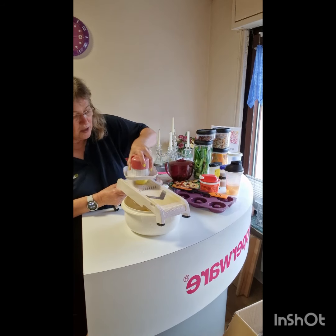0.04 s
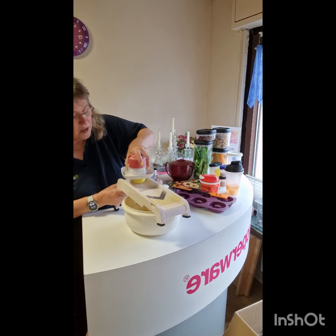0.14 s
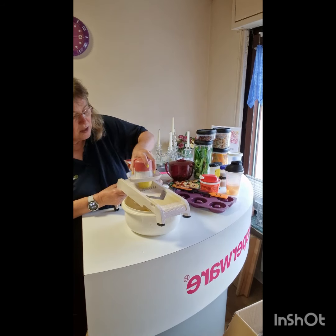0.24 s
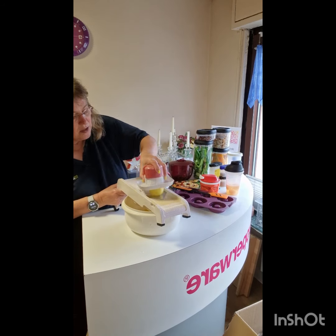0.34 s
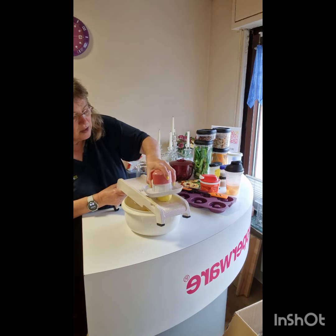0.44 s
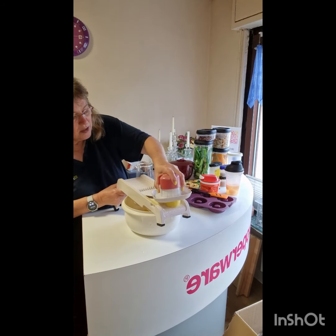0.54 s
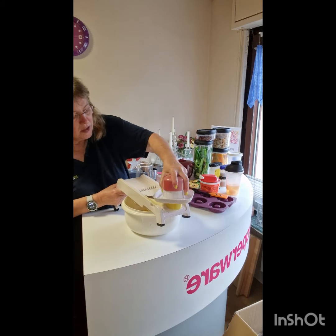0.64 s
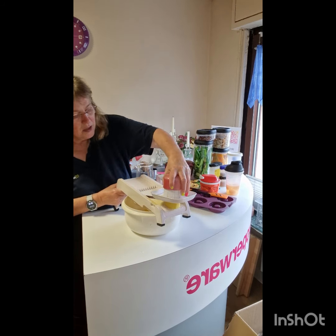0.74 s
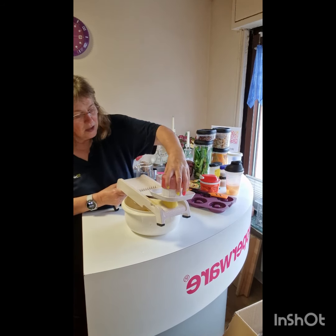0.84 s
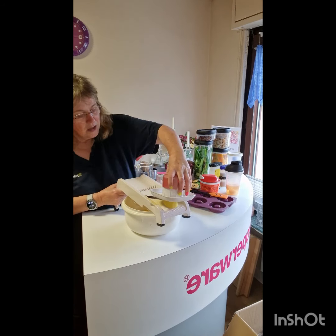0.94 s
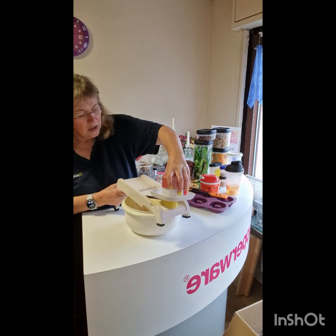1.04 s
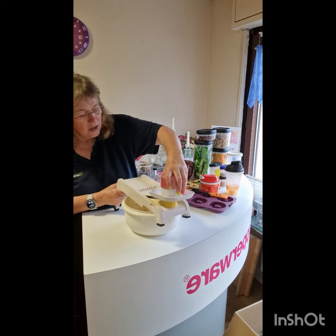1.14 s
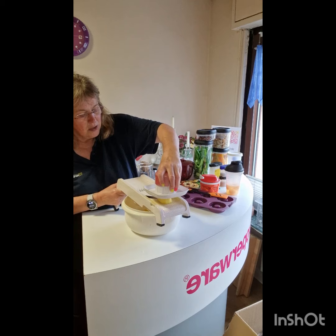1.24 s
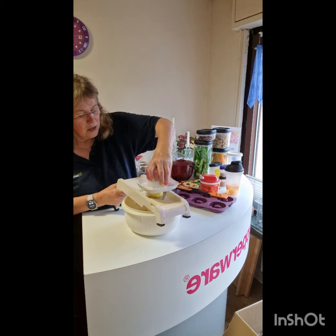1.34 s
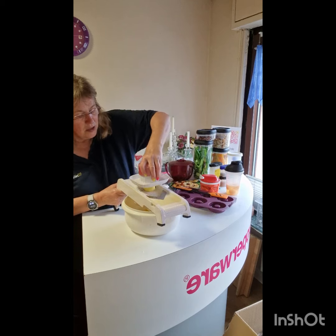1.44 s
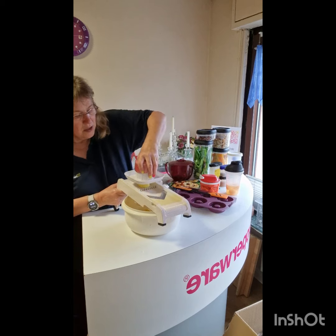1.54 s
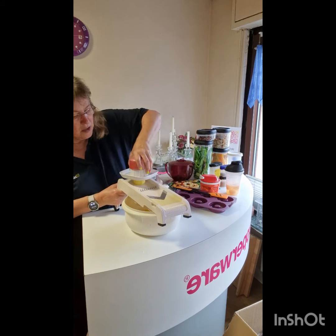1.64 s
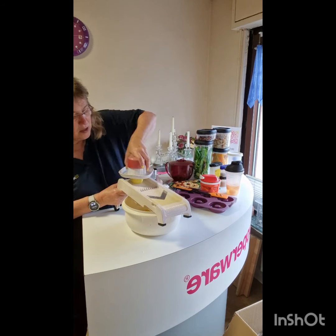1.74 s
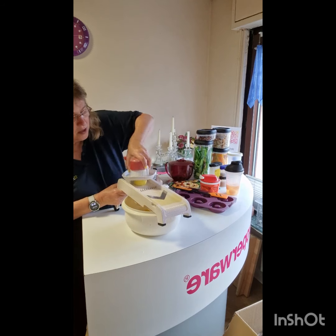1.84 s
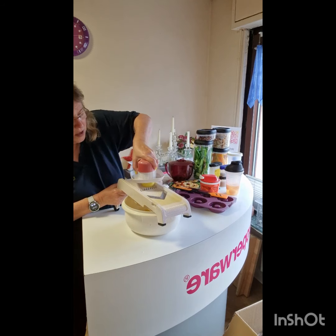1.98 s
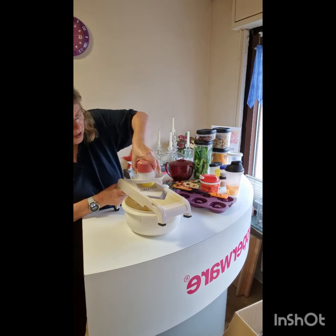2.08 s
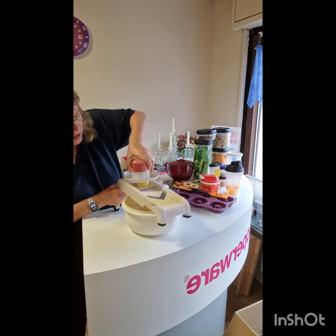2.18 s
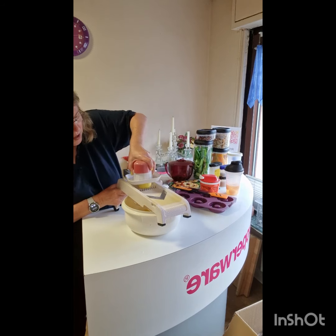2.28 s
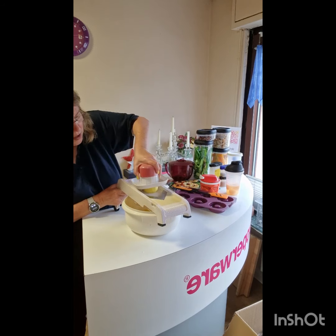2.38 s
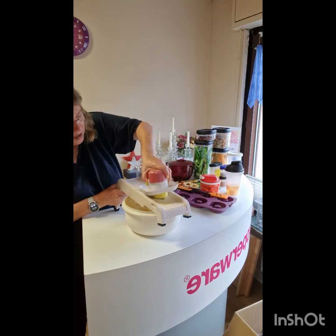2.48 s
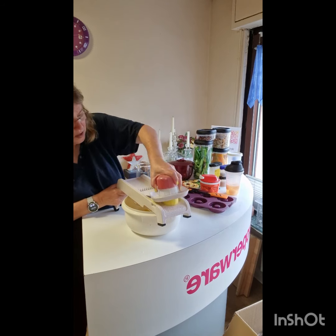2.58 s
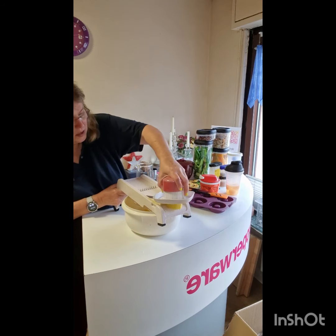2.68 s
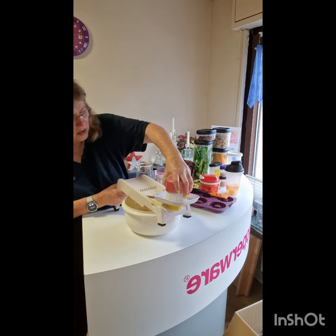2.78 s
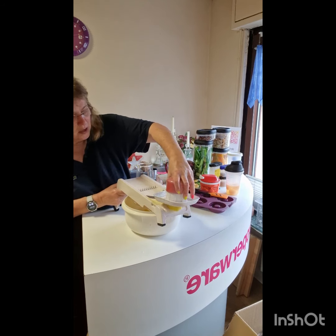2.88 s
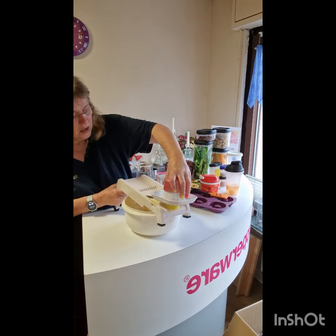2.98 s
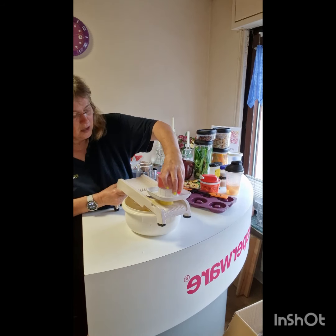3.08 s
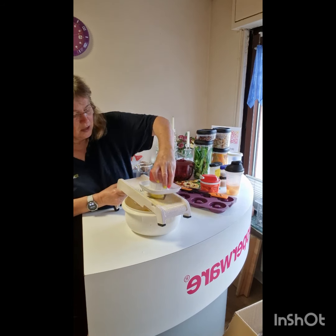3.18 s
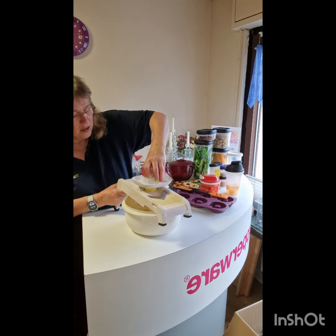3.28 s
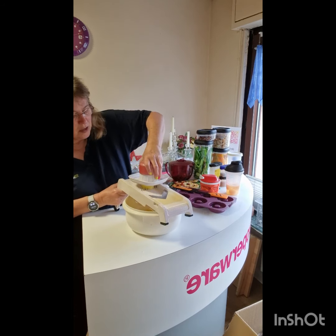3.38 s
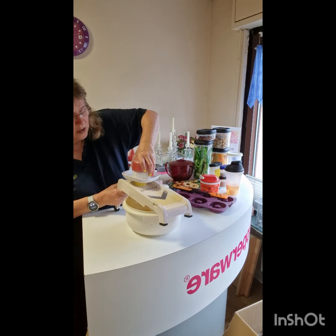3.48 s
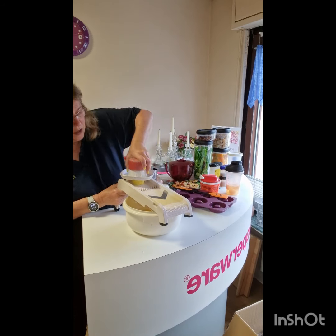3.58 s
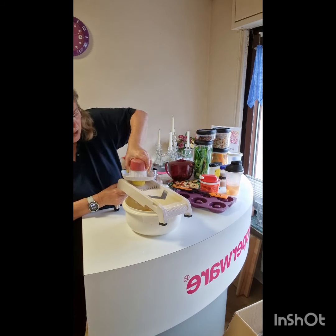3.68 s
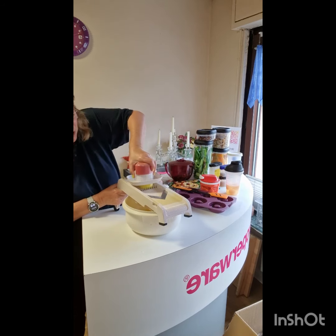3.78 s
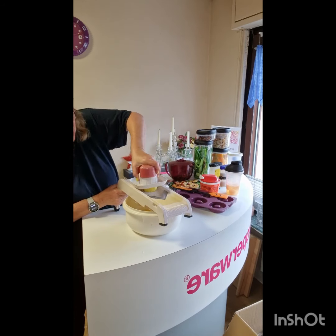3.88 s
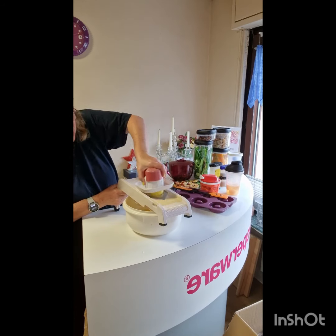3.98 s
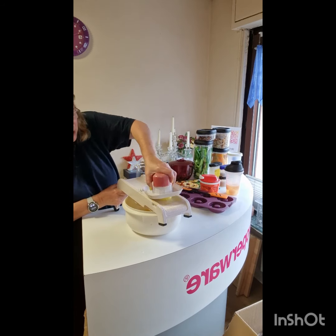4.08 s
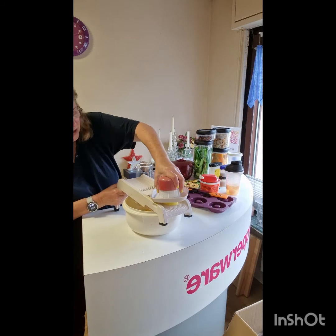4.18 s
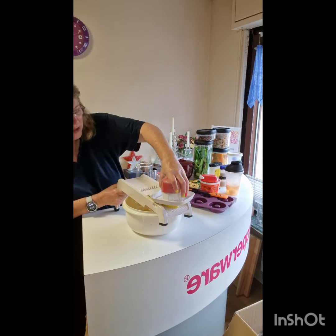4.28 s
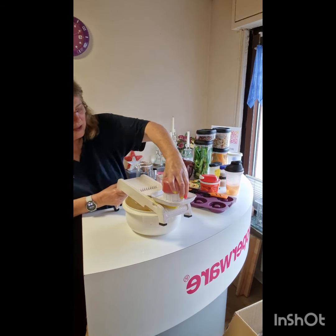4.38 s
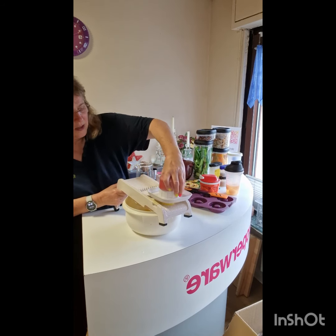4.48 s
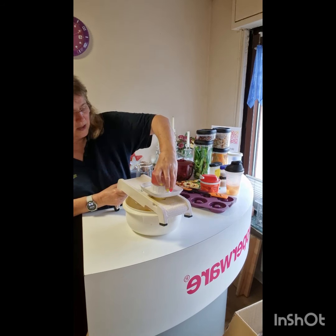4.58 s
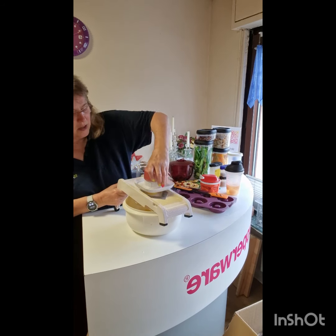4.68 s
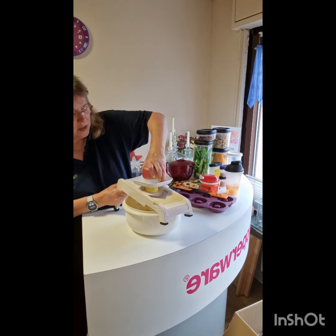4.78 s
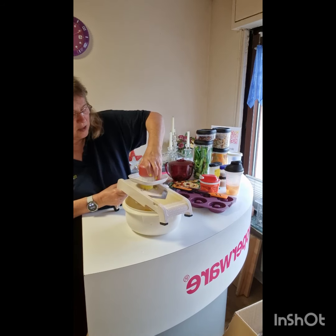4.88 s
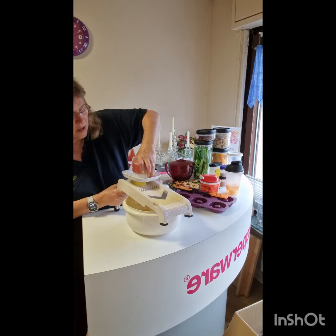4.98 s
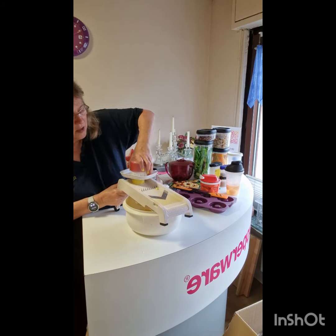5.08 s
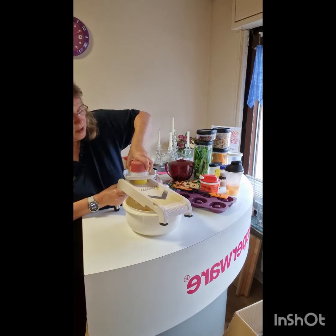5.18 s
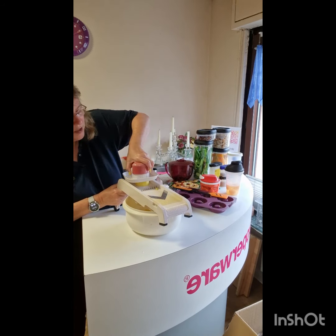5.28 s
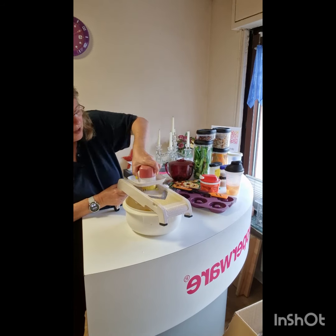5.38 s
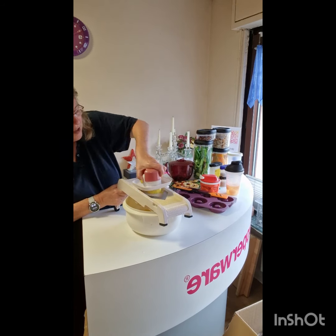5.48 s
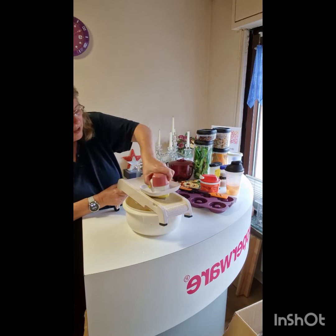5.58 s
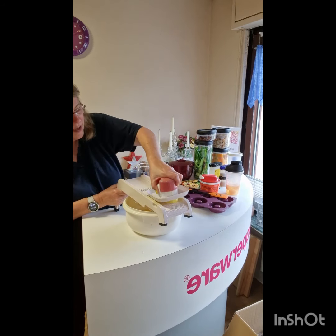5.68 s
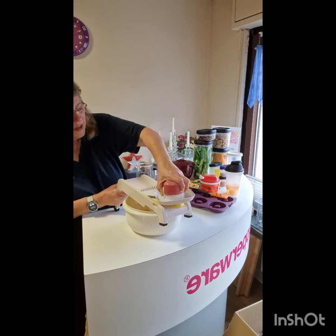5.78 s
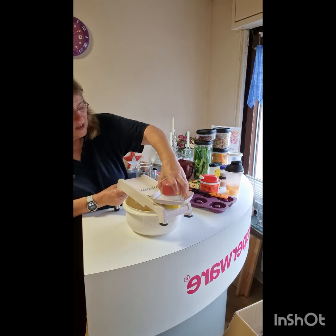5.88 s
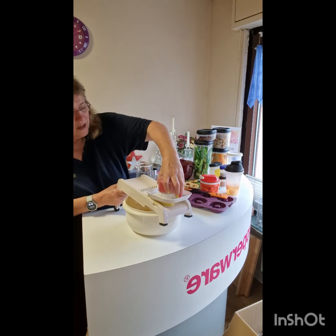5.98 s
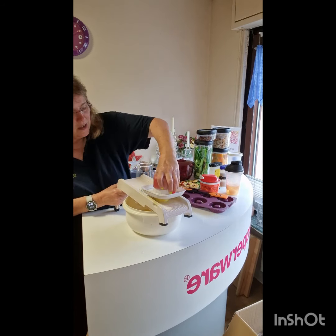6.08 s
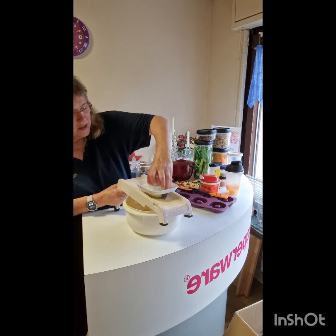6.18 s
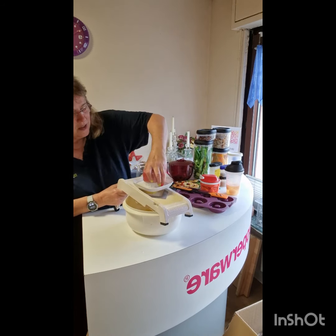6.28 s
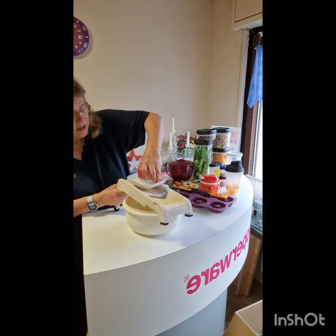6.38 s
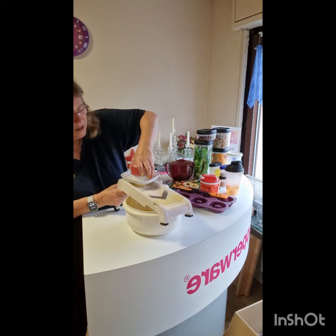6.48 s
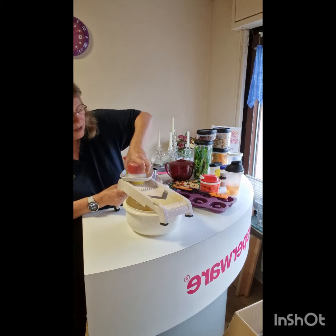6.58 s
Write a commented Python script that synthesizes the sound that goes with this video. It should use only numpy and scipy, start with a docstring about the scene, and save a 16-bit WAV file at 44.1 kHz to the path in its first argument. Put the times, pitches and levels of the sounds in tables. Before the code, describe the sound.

In a small hard kitchen with very quiet air, a plastic holder taps and slides lightly on a slicer ramp, then knocks at 0.4 s and drives through the blades with a bright, wet crunch that fades fast. A near-quiet pause follows until 1.5 s, when the return jolts with a hard clack, low thump and short scrape, trailed by small taps. A second, longer crunch comes at 2.4 s, ending around 2.8 s in a brief rising squeaky judder. The return at 3.3 s clatters sharply. Knocks lead to a cut at 3.9 s, with a strong clack at 4.15 s and rattling glides. Another return bangs and scrapes at 4.75 s; the fourth crunch is at 5.5 s, and a last return thuds and rasps at 6.3 s. The bowl rings hollowly and briefly; the counter booms and groans faintly. Sound leans slightly left.

```python
"""A potato is sliced in four forward strokes on a mandoline: random grains filtered to a crunch and a wet fizz.
Its plastic holder knocks on the frame (clusters of impacts through resonances) and glides on the ramp
(small catches); each return jolts and scrapes over the blades, and one stroke ends in a stick-slip judder.
The bowl beneath rings as damped modes, and the counter thumps, booms and groans.
A small hard room adds decaying reflections over a quiet room tone."""
import sys
import numpy as np
from scipy import signal
from scipy.fft import rfft, irfft
from scipy.io import wavfile
from scipy.ndimage import uniform_filter1d

SR = 44100
rng = np.random.default_rng(int(sys.argv[2]) if len(sys.argv) > 2 else 0)


def digitize_waveform(pressure):
    """Quantize a signal to 16-bit integers and store it at the path in sys.argv[1].

    Rows of a 2-D input are taken as channels; values are limited to [-1, 1].
    """
    field = np.atleast_2d(pressure).T
    bounded = np.clip(field, -1, 1)
    quanta = np.round(bounded * 32767).astype(np.int16)
    wavfile.write(sys.argv[1], SR, quanta)


N = 292383
T = np.arange(N) / SR  # time/s
HZ = np.fft.rfftfreq(2 * N, 1 / SR)  # f/Hz, for a signal padded to twice its length
HIT = SR // 2  # samples given to one blow or one reverberant tail

# Relative spectra and event levels below are set before the fixed trims of the mix.
# Quiet air of the room: [f/Hz, relative level/dB]
ROOM_TONE_SPECTRUM = [(20, -4), (55, 0), (100, -10), (200, -20), (337, -16), (450, -23), (920, -26),
                      (1700, -27), (4200, -32), (7500, -36), (10500, -48), (16000, -50)]
# Reverberation of the kitchen: [f/Hz, t60/s, reverberant minus direct level/dB]
ROOM_DECAY = [(102, 0.49, -12), (237, 0.27, -9.5), (480, 0.57, -7), (1120, 0.48, 5.5), (3450, 0.3, 3.5),
              (8100, 0.32, 6), (16000, 0.36, 5)]
# Lateral balance: [f/Hz, left minus right level/dB]
LEFT_LEAN = [(100, .5), (500, .9), (1000, 2.4), (2000, 3.4), (4000, 3.8), (8000, 2.1), (14000, 2.3)]
# Modes of the counter top: [f/Hz, t60/s, level/dB]
COUNTER_MODES = [(31.5, 0.25, -11), (47, 0.48, 4), (73, 0.49, -0.5), (127.3, 0.52, 4.5), (191.6, 0.23, 3.5),
                 (258, 0.1, 4), (332, 0.077, 9.5)]
# Rocking of the counter: [f/Hz, relative level/dB]
BOOM_SPECTRUM = [(12, -28.5), (30, 3), (52, 0), (75, 4), (110, -7), (160, -28.5), (400, -58.5)]
# Friction of the bowl's foot on the counter: [f/Hz, relative level/dB]
GROAN_SPECTRUM = [(80, -24), (135, 8), (190, -6.5), (260, -3.5), (305, -11), (365, -2), (430, -9),
                  (900, -45.5)]
# The bowl's foot shifts on the counter: [t/s, length/s, groan level/dB, boom level/dB]
FOOT_SHIFTS = [(0.044, 0.19, -70, -65), (0.45, 0.049, -57, -51), (0.685, 0.049, -62.5, -61.5),
               (0.796, 0.026, -64, -62), (0.913, 0.054, -77, -61.5), (1.48, 0.032, -37, -56),
               (1.817, 0.02, -55, -84), (2.078, 0.04, -67, -60), (2.45, 0.15, -60, -58),
               (3.703, 0.071, -42.5, -45.5), (4.105, 0.092, -52.5, -47), (4.305, 0.046, -47, -52.5),
               (4.781, 0.018, -41, -35.5), (4.86, 0.14, -74, -58), (5.193, 0.11, -50.5, -55),
               (5.81, 0.083, -62, -57), (5.892, 0.16, -55.5, -59), (6.333, 0.027, -43, -34)]
# Modes of the bowl under the slicer: [f/Hz, t60/s, level/dB]
BOWL_MODES = [(335.7, 0.24, -18), (381.8, 0.18, -9.5), (508.5, 0.19, -8), (540, 0.053, 4),
              (588, 0.073, -6.5), (673.6, 0.12, -14.5), (698, 0.12, -5.5), (760, 0.084, -9.5)]
# Resonances of the slicer frame: [f/Hz, width/Hz, level/dB]
FRAME_RESONANCES = [(1064.4, 35.5, 1.5), (1416, 164, -4.5), (1541, 120, -7), (2010, 140, -7),
                    (2210, 136, -7), (2594, 8.2, -7), (3112, 170, -1.5), (3820, 160, -4), (4050, 310, -7),
                    (4900, 370, -4.5), (5790, 680, -1.5), (7480, 150, 1)]
# Holder gliding on the ramp: [t/s, length/s, level/dB]
RAMP_GLIDES = [(0.013, 0.032, -56), (0.177, 0.36, -70.5), (0.618, 0.24, -76), (1.982, 0.37, -63),
               (2.89, 0.29, -67), (3.257, 0.05, -56), (3.34, 0.019, -56), (3.621, 0.74, -61.5),
               (4.24, 0.17, -57.5), (4.57, 0.38, -62), (5.078, 0.37, -59), (5.83, 0.23, -55.5),
               (6.256, 0.08, -55.5)]
# Plastic rubbing on the ramp: [f/Hz, relative level/dB]
GLIDE_SPECTRUM = [(200, -32), (380, 4.5), (540, 14), (850, 3.5), (1500, 0), (2300, -3.5), (4000, -9),
                  (7000, -19), (10000, -22.5), (16000, -55)]
# Holder sticking and slipping at the foot of the ramp:
# [t/s, slip rate/(1/s), squeak f/Hz, frame level/dB, bowl ring level/dB]
STICK_SLIP = [(2.745, 150, 1120, -58, -68), (2.775, 150, 1190, -47, -62), (2.805, 140, 1250, -44, -58),
              (2.825, 115, 1500, -44, -58), (2.855, 130, 1510, -44, -47), (2.875, 130, 1520, -45, -53),
              (2.895, 130, 1550, -56, -60)]
# Scraping of the stick-slip contact: [f/Hz, relative level/dB]
RASP_SPECTRUM = [(400, -45), (1000, -1.5), (1600, 0), (2250, 3.5), (3200, -8.5), (5000, -16.5), (8000, -29),
                 (16000, -37)]
# Holder meeting the frame: [t/s, clack level/dB, edge tick level/dB, bowl ring level/dB,
# counter thump level/dB, clack centre f/Hz, bowl centre f/Hz]
FRAME_KNOCKS = [(0.033, -53, -69, -59, -68, 920, 490), (0.0462, -48.5, -63, -58.5, -55, 2160, 590),
                (0.0772, -59, -56.5, -69, -58, 1280, 347), (0.1594, -70, -69, -54, -56, 1500, 532),
                (0.1786, -50.5, -72, -59, -69, 1820, 520), (0.2449, -77, -86, -54, -76, 910, 527),
                (0.2606, -55, -90, -68, -65, 2260, 475), (0.3298, -52.5, -64, -56, -74, 2220, 520),
                (0.3865, -38.5, -40.5, -41, -39, 1770, 576), (0.666, -65, -74, -54.5, -64, 1950, 522),
                (1.4175, -54.5, -54, -59, -68, 1440, 566), (1.4456, -48, -55.5, -48.5, -67, 1780, 506),
                (1.481, -34, -38.5, -32.5, -42, 1700, 348), (1.5146, -45, -50, -61, -36.5, 1970, 396),
                (1.531, -43, -45, -50, -37, 2270, 394), (1.599, -52, -70, -66, -48, 2200, 358),
                (1.6676, -47, -75, -49.5, -59, 1970, 545), (1.7114, -49.5, -83, -53, -65, 1910, 503),
                (1.7485, -52.5, -82, -57, -63, 1900, 513), (2.0948, -48.5, -51, -58, -62, 2200, 575),
                (2.2424, -55.5, -86, -61, -62, 2050, 368), (2.301, -68, -90, -55.5, -54, 1470, 500),
                (2.427, -39, -41, -40, -56, 1820, 590), (2.5961, -46, -66, -48, -44, 1060, 520),
                (2.8477, -56, -77, -46, -70, 1480, 375), (2.958, -63, -88, -44, -63, 1580, 540),
                (3.3051, -44, -59, -52, -49, 1960, 580), (3.3309, -41, -47, -33, -58, 1040, 607),
                (3.3664, -37, -32, -44, -44, 1060, 620), (3.3715, -29.5, -42, -36, -35, 2600, 504),
                (3.4176, -43, -60, -34, -37, 2470, 507), (3.4436, -44, -66, -39, -48, 1560, 522),
                (3.5044, -65, -61, -45.5, -38.5, 2230, 533), (3.711, -45.5, -46.5, -35.5, -68, 1760, 543),
                (3.7231, -37.5, -55, -39, -40.5, 4000, 511), (3.7596, -36.5, -51.5, -51, -47, 1470, 416),
                (3.921, -42.5, -40.5, -37.5, -51, 1720, 520), (4.1406, -30, -42, -34, -43, 865, 530),
                (4.1474, -43, -42, -39, -46, 1080, 672), (4.2155, -44.5, -68, -45.5, -51, 1500, 524),
                (4.2665, -47.5, -77, -45.5, -43, 2160, 580), (4.326, -43, -59, -57, -38.5, 2230, 334),
                (4.3984, -49, -86, -54.5, -67, 1430, 554), (4.5396, -62, -83, -58.5, -52.5, 1448, 530),
                (4.6383, -57.5, -61, -65, -59, 1780, 550), (4.6683, -58, -53.5, -72, -67, 1540, 571),
                (4.715, -45.5, -61, -55, -47, 1790, 382), (4.7481, -43, -63, -47, -66, 2970, 490),
                (4.7651, -35, -43, -29, -35, 3180, 620), (4.7771, -35.5, -66, -31, -30, 1830, 538),
                (4.9247, -46, -50.5, -62, -62, 1940, 500), (5.125, -56.5, -76, -54.5, -56, 1630, 568),
                (5.3298, -58.5, -68, -68, -68, 2030, 520), (5.3559, -48, -63, -54, -55, 2180, 510),
                (5.375, -48, -59.5, -46.5, -58, 1050, 532), (5.4332, -42.5, -59, -39.5, -48.5, 1850, 540),
                (5.4886, -42, -39, -45.5, -45, 1940, 501), (5.5894, -47, -57, -43.5, -61, 3070, 555),
                (5.6406, -43.5, -49, -50, -45, 1420, 495), (5.7764, -44, -58, -50.5, -60, 1100, 625),
                (5.9933, -43, -71, -48, -56, 1280, 470), (6.2969, -46.5, -57, -39, -46, 1080, 513),
                (6.3268, -34.5, -49, -37, -33.5, 1070, 490), (6.3373, -37.5, -44, -36, -33.5, 1050, 400),
                (6.6089, -50.5, -62, -47, -70, 1510, 540)]
# Impact on the frame: [f/Hz, relative level/dB]
CLACK_SPECTRUM = [(250, 5), (600, -7), (1000, 0), (2000, 0.5), (3200, -6), (5000, -10), (7000, -35.5),
                  (10000, -33), (16000, -69)]
# Forward strokes through the blades: [t/s, length/s, crunch level/dB, wet fizz level/dB,
# bowl ring level/dB, easing/(dB/s), crunch centre f/Hz, load on the counter, level/dB]
FORWARD_CUTS = [(0.377, 0.18, -40, -46, -43.5, 91, 1640, -56.5),
                (2.412, 0.26, -43, -48, -44, 38, 2290, -52),
                (3.923, 0.29, -44.5, -51, -47.5, 11.5, 2120, -51),
                (5.496, 0.3, -41, -48, -43, 43.5, 2000, -52)]
# Return strokes over the blades: [t of jolt/s, jolt level/dB, lag until the scrape/s, scrape length/s,
# crunch level/dB, wet fizz level/dB, bowl ring level/dB, crunch centre f/Hz]
BLADE_RETURNS = [(1.472, -38.5, 0.1, 0.082, -45.5, -52.5, -66, 2220),
                 (3.336, -37, 0.094, 0.088, -47, -57.5, -50, 2770),
                 (4.764, -37, 0.15, 0.13, -43.5, -54, -48.5, 2160),
                 (6.316, -37, 0.1, 0.12, -42, -52.5, -49.5, 2130)]
# Flesh breaking at the blades: [f/Hz, relative level/dB]
CRUNCH_SPECTRUM = [(300, -10), (700, 4), (1200, 0), (2200, 2), (4000, -0.5), (6000, -7), (8000, -13),
                   (11000, -66), (16000, -18)]
# Wet fizz at the blades, also the colour of edge ticks: [f/Hz, relative level/dB]
FIZZ_SPECTRUM = [(3000, -22), (6000, -0.5), (7800, -1.5), (9000, -5.5), (11000, -7.5), (13000, -9.5),
                 (16000, -14.5)]

TOP_HZ = 15950
ROOM_TONE_DB = -70.5
RESTING_BOOM_DB, RESTING_GROAN_DB = -69.5, -72  # under the steadying hand
SHIFT_RISE_S, SHIFT_FALL_S = 0.025, 0.027
ROCK_FALL_S, GROAN_FALL_S, UNLOAD_S = 0.14, 0.083, 0.19  # settling after a jolt and after a cut
LOAD_SAG_DB_PER_S = 22.5  # the arm leans less as a cut goes on
GLIDE_RISE_S, GLIDE_FALL_S, GLIDE_CENTRE_HZ = 0.016, 0.094, 1860
SCUFF_S, SCUFF_DB = 0.0062, -8  # growth time of the rub before a knock; level relative to the clack
# a clack of level RATTLE_AT_DB has decay time RATTLE_S; growth in dB of time per dB of level
RATTLE_S, RATTLE_AT_DB, RATTLE_GROWTH = 0.0049, -44.5, 0.1
BITE_DB, BITE_S = 1, 0.075  # the blades' first bite is louder
CUT_RISE_S, CUT_FALL_S, DRYING_DB_PER_S = 0.01, 0.06, 28  # the fizz dies sooner than the crunch
SCRAPE_RISE_S, SCRAPE_FALL_S, SCRAPE_SAG_DB_PER_S = 0.024, 0.014, 35
JOLT_RISE_S, JOLT_FALL_S = 0.009, 0.063
JOLT_CRUNCH_DB, JOLT_FIZZ_DB, JOLT_BOWL_DB = -3.5, -17, -3  # relative to the jolt
CATCH_RATE, CATCH_DB = 55, 2.5  # the blades catch and let go: changes a second, spread of level


def undb(db):
    """Level: decibels convert to an amplitude ratio."""
    return 10 ** (np.asarray(db) / 20)


def unit(x):
    """Normalisation: the signal is scaled to rms 1."""
    return x / np.sqrt(np.mean(x ** 2))


def even(x, span_s):
    """Automatic levelling: division by the running rms holds a rumble near rms 1."""
    return x / np.sqrt(uniform_filter1d(x ** 2, int(span_s * SR)) + 1e-18)


def along(points, hz, column=1):
    """Interpolation: a table is read on a log-frequency axis."""
    rows = np.array(points)
    return np.interp(np.log(hz + 1), np.log(rows[:, 0]), rows[:, column])


def shape(x, gain):
    """Linear filtering: the spectrum is multiplied by a response given on HZ."""
    return irfft(rfft(x, 2 * N) * gain)[..., :N]


def causal(gain):
    """Minimum phase: the folded cepstrum gives a response that rings only after a blow."""
    cepstrum = irfft(np.log(gain))
    cepstrum[1:N] *= 2
    cepstrum[N + 1:] = 0
    return np.exp(rfft(cepstrum))


def envelope(start, length, rise_s, fall_s, sag_db_per_s=0):
    """Transient envelope: linear attack, a hold that may sag, and exponential release."""
    age = (T - start).clip(0)
    attack = (age / rise_s).clip(0, 1)
    hold = undb(-sag_db_per_s * np.minimum(age, length))
    release = np.exp(-(age - length).clip(0) / fall_s)
    return attack * hold * release


def flutter(rate, depth_db):
    """Random modulation: a gain wanders between Gaussian levels drawn `rate` times a second."""
    knots = rng.standard_normal(8192)
    return undb(depth_db * np.interp(T * rate, np.arange(len(knots)), knots))


def grains(rate, spread_db):
    """Shot noise: tiny random snaps, a few much larger than the rest."""
    size = undb(spread_db * rng.exponential(size=N).clip(0, 4))
    happens = rng.random(N) < rate / SR
    return unit(happens * size * np.sign(rng.standard_normal(N)))


def chatter(rise_s, fall_s):
    """Contact force: one contact is a quick cluster of small impacts of uneven size."""
    t = T[:HIT]
    impacts, size = rng.standard_normal((2, HIT))
    return impacts * undb(6.15 * size) * (1 - np.exp(-t / rise_s)) * np.exp(-t / fall_s)


def ring(modes, scatter_db, detune, weight=1):
    """Modal decay: damped sines whose strength and tuning vary at random with where the holder presses."""
    hz, t60, db = np.array(modes).T[:, :, None]
    strength, stretch = rng.standard_normal((2, len(modes), 1))
    t = T[:HIT]
    decay = undb(db + scatter_db * strength) * np.exp(-np.log(1000) * t / t60)
    waves = decay * np.sin(2 * np.pi * hz * (1 + detune * stretch) * t)
    return np.sum(waves.T * weight, axis=1)


def focus(hz, centre_hz, octaves, depth_db):
    """Selective excitation: the contact point favours the resonances around one pitch."""
    closeness = np.exp(-(np.log2((hz + 1) / centre_hz) / octaves) ** 2)
    return undb(depth_db * (closeness - 1))


def travel(x, centre_hz, octaves, depth_db):
    """Moving excitation: the favoured pitch shifts as the holder travels along the frame."""
    hz, s, frames = signal.stft(x, SR, nperseg=256)
    gain = focus(hz[:, None], np.interp(s, T, centre_hz), octaves, depth_db)
    return signal.istft(frames * gain, SR)[1][:N]


def blow(x, db):
    """Impact level: the energy of a blow is referred to 20 ms."""
    return x * undb(db) / np.sqrt(np.sum(x ** 2) / (SR / 50))


def frame(plain_db):
    """Resonant radiation: the powers of the frame's resonances add to a broad floor."""
    power = undb(plain_db) ** 2
    for hz, width, db in FRAME_RESONANCES:
        power = power + undb(db) ** 2 / (1 + (2 * (HZ - hz) / width) ** 2)
    return np.sqrt(power)


def room_tone():
    """Interaural coherence: quiet noise, slightly swelling, has nearly the same bass at both ears."""
    mid, side = shape(rng.standard_normal((2, N)), undb(along(ROOM_TONE_SPECTRUM, HZ)))
    side = shape(side, np.clip(HZ / 1200, .15, .85))
    ears = unit(np.array([mid + side, mid - side]))
    return undb(ROOM_TONE_DB) * ears * flutter(rate=7.9, depth_db=2.4)


def reflections(count):
    """Reverberant decay: band noise dies by its t60 at each ear, once for each of several patterns."""
    t = T[:HIT]
    hz = np.fft.rfftfreq(HIT, 1 / SR)
    noise = rfft(rng.standard_normal((count, 2, HIT)))
    near = (1 + 3.33 * np.exp(-t / 0.012)) * (t > .0015)  # counter and wall reflect first
    tails = 0
    for centre in 2. ** np.arange(5, 15):  # octave bands
        band = irfft(noise * (abs(np.log2((hz + 1) / centre)) < .5), HIT)
        fade = near * np.exp(-np.log(1000) * t / along(ROOM_DECAY, centre))
        tails = tails + band * fade / np.sqrt(np.sum(fade ** 2))
    return tails


def kitchen(x):
    """Superposition: direct sound, a little to the left, plus reflections whose pattern changes each 0.1 s."""
    hz = np.fft.rfftfreq(2 * HIT, 1 / SR)
    wet = undb(along(ROOM_DECAY, hz, column=2))
    lean = undb(np.outer([1, -1], along(LEFT_LEAN, hz)) / 2)
    paths = lean * (1 + wet * rfft(reflections(count=11), 2 * HIT)) / np.sqrt(1 + wet ** 2 / 2)
    step = SR // 10
    padded, out = np.pad(x, (step, 2 * step)), np.zeros((2, N + 3 * HIT))
    for k, start in enumerate(range(0, N + step, step)):
        piece = padded[start:start + 2 * step] * np.hanning(2 * step)  # overlapping windows crossfade
        out[:, start:start + 2 * HIT] += irfft(rfft(piece, 2 * HIT) * paths[k % len(paths)])
    return out[:, step:step + N]


def counter():
    """Forced vibration: cuts, jolts and shifts rock the counter; the bowl's foot groans in short catches."""
    boom = even(shape(rng.standard_normal(N), undb(along(BOOM_SPECTRUM, HZ))), span_s=0.055)
    catches = grains(rate=220, spread_db=1.0)
    groan = even(shape(catches, causal(undb(along(GROAN_SPECTRUM, HZ)))), span_s=0.079)
    load = 0
    for s, length, *_, db in FORWARD_CUTS:
        load = load + undb(db) * envelope(s, length, CUT_RISE_S, UNLOAD_S, LOAD_SAG_DB_PER_S)
    rock = undb(RESTING_BOOM_DB) + load
    drag = undb(RESTING_GROAN_DB) + undb(-3) * load
    for s, jolt_db, *_ in BLADE_RETURNS:
        rock = rock + undb(jolt_db) * envelope(s, JOLT_RISE_S, JOLT_RISE_S, ROCK_FALL_S)
        drag = drag + undb(jolt_db - 1.9) * envelope(s, JOLT_RISE_S, JOLT_RISE_S, GROAN_FALL_S)
    for s, length, groan_db, boom_db in FOOT_SHIFTS:
        shift = envelope(s, length, SHIFT_RISE_S, SHIFT_FALL_S)
        rock = rock + undb(boom_db) * shift
        drag = drag + undb(groan_db) * shift
    return undb(-2.0) * boom * rock + undb(-4.5) * groan * drag


def gliding(body):
    """Sliding friction: wet plastic slips in small catches, and the loose holder taps the rails at random."""
    catches = grains(rate=1800, spread_db=2.5) * flutter(rate=45, depth_db=2)
    tap_force = chatter(rise_s=0.0012, fall_s=0.0046)
    taps = signal.fftconvolve(grains(rate=28, spread_db=0.5), tap_force)[:N]
    rub = shape(unit(catches) + unit(taps), causal(body * undb(along(GLIDE_SPECTRUM, HZ))))
    centre_hz = GLIDE_CENTRE_HZ * flutter(rate=18, depth_db=3.5)
    rub = unit(travel(rub, centre_hz, octaves=0.37, depth_db=5.5))
    motion = 0
    for s, length, db in RAMP_GLIDES:
        motion = motion + undb(db) * envelope(s, length, GLIDE_RISE_S, GLIDE_FALL_S)
    return undb(-1) * rub * motion


def judder(body):
    """Stick-slip: every slip jolts frame and bowl and renews a squeak that rises as the holder moves."""
    s, rate, squeak_hz, frame_db, bowl_db = np.array(STICK_SLIP).T
    slip_rate = np.interp(T, s, rate)
    cycle = np.cumsum(slip_rate * flutter(rate=120, depth_db=2.2)) / SR % 1
    jolt = np.exp(-cycle / slip_rate / .0028)
    pitch = np.interp(T, s, squeak_hz) * flutter(rate=300, depth_db=.5)
    squeak = jolt * np.sin(2 * np.pi * np.cumsum(pitch) / SR)
    squeak = unit(shape(squeak, 1 / (1 + (HZ / 3000) ** 4)))  # each slip's squeak is dulled above about 3 kHz
    scrape = jolt * rng.standard_normal(N)
    rasp = unit(shape(scrape, causal(body * undb(along(RASP_SPECTRUM, HZ)))))
    bowl = unit(shape(scrape, focus(HZ, 500, octaves=1.67, depth_db=61)))
    frame_sound = undb(-3) * squeak + undb(-4.5) * rasp
    contact = envelope(s[0] - 0.015, s[-1] - s[0] + 0.0069, 0.0032, 0.005)
    frame_gain, bowl_gain = undb(np.interp(T, s, frame_db)), undb(np.interp(T, s, bowl_db))
    return contact * (frame_sound * frame_gain + bowl * bowl_gain)


def scuffs(body):
    """Closing friction: a brief rub grows exponentially into each knock as the holder nears the frame."""
    gain = np.zeros(N)
    lead = np.exp(-T[:HIT][::-1] / SCUFF_S)
    for s, clack_db, *_ in FRAME_KNOCKS:
        end = int(s * SR)
        gain[max(end - HIT, 0):end] += undb(clack_db + SCUFF_DB) * lead[-end:]
    rub = shape(grains(rate=4500, spread_db=4), causal(body * undb(along(CRUNCH_SPECTRUM, HZ))))
    return gain * unit(rub)


def knocks(body):
    """Impact excitation: each knock ticks at the edge, clacks in the frame, rings bowl and thumps counter."""
    out = np.zeros(N + HIT)
    hz = np.fft.rfftfreq(HIT, 1 / SR)
    clack_gain = rfft(irfft(causal(body * undb(along(CLACK_SPECTRUM, HZ))))[:HIT])
    tick_gain = rfft(irfft(causal(undb(along(FIZZ_SPECTRUM, HZ))))[:HIT])
    mode_hz = np.array(BOWL_MODES)[:, 0]
    for s, clack_db, tick_db, bowl_db, thump_db, clack_hz, bowl_hz in FRAME_KNOCKS:
        rattle_s = RATTLE_S * undb(RATTLE_GROWTH * (clack_db - RATTLE_AT_DB))
        colour = clack_gain * focus(hz, clack_hz, octaves=0.32, depth_db=8)
        clack = irfft(rfft(chatter(rise_s=0.0011, fall_s=rattle_s)) * colour)
        tick = irfft(rfft(chatter(rise_s=0.000053, fall_s=0.0043)) * tick_gain)
        weight = focus(mode_hz, bowl_hz, octaves=0.084, depth_db=15.5)
        bowl = ring(BOWL_MODES, scatter_db=5.5, detune=0.014, weight=weight)
        bowl = bowl * (1 - np.exp(-T[:HIT] / 0.0031))  # the ring builds as the frame passes the blow down
        thump = ring(COUNTER_MODES, scatter_db=4.0, detune=0.034)
        hit = blow(clack, clack_db - 3) + blow(tick, tick_db - 7.5)
        hit = hit + blow(bowl, bowl_db - 1.5) + blow(thump, thump_db - 4.5)
        start = int(s * SR)
        out[start:start + HIT] += hit
    return out[:N]


def strokes():
    """Work at the blades: gains of crunch, fizz and bowl; a cut bites and eases, a return jolts then scrapes."""
    gains = np.zeros((3, N))
    for s, length, crunch_db, fizz_db, bowl_db, easing, _, _ in FORWARD_CUTS:
        age = (T - s).clip(0)
        push = envelope(s, length, CUT_RISE_S, CUT_FALL_S, easing) * undb(BITE_DB * np.exp(-age / BITE_S))
        gains += [push * undb(crunch_db), push * undb(fizz_db - DRYING_DB_PER_S * age), push * undb(bowl_db)]
    for s, jolt_db, lag, length, crunch_db, fizz_db, bowl_db, _ in BLADE_RETURNS:
        jolt = undb(jolt_db) * envelope(s, JOLT_RISE_S, JOLT_RISE_S, JOLT_FALL_S)
        scrape = envelope(s + lag, length, SCRAPE_RISE_S, SCRAPE_FALL_S, SCRAPE_SAG_DB_PER_S)
        gains += np.outer(undb([JOLT_CRUNCH_DB, JOLT_FIZZ_DB, JOLT_BOWL_DB]), jolt)
        gains += np.outer(undb([crunch_db, fizz_db, bowl_db]), scrape)
    return gains


def cutting(body):
    """Fracture noise: cells burst in a dense uneven crunch with a wet fizz, which also shakes the bowl."""
    catch = flutter(CATCH_RATE, CATCH_DB)
    crunch_gain, fizz_gain, bowl_gain = strokes()
    bursts = grains(rate=2600, spread_db=4.0) * catch
    bursts = shape(bursts, causal(body * undb(along(CRUNCH_SPECTRUM, HZ))))
    colours = [(row[0], row[6]) for row in FORWARD_CUTS] + [(row[0], row[7]) for row in BLADE_RETURNS]
    starts, centres = np.array(sorted(colours)).T
    stroke_hz = centres[(np.searchsorted(starts, T) - 1).clip(0)]  # each stroke has its own colour
    centre_hz = stroke_hz * flutter(rate=25, depth_db=2.5)
    crunch = unit(travel(bursts, centre_hz, octaves=0.98, depth_db=5.5))
    fizz = unit(shape(grains(rate=7500, spread_db=5), undb(along(FIZZ_SPECTRUM, HZ))))
    shakes = grains(rate=580, spread_db=5.0) * catch
    bowl = unit(signal.fftconvolve(shakes, ring(BOWL_MODES, scatter_db=0.5, detune=0.013))[:N])
    return undb(-3.0) * crunch * crunch_gain + undb(-3.5) * fizz * fizz_gain + undb(-3) * bowl * bowl_gain


def scene():
    """Superposition: all the work on the slicer sums, is heard in the kitchen, and joins the room tone."""
    body = frame(plain_db=-12)
    holder = gliding(body) + judder(body) + scuffs(body) + knocks(body)
    return room_tone() + kitchen(counter() + holder + cutting(body))


def record(dry):
    """Band limitation: a steep elliptic low-pass removes the extreme treble."""
    return signal.sosfilt(signal.ellip(10, .2, 70, TOP_HZ, fs=SR, output="sos"), dry)


dry = scene()
out = record(dry)
digitize_waveform(out)
```